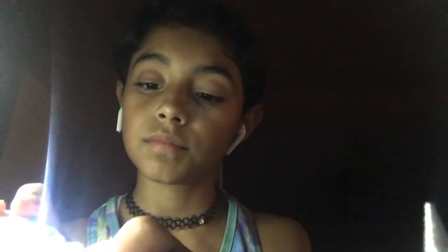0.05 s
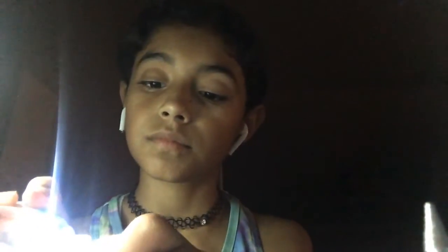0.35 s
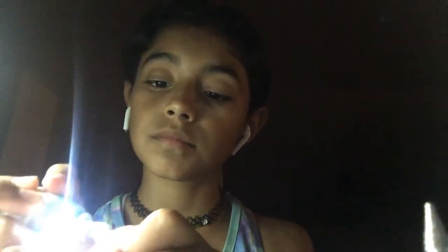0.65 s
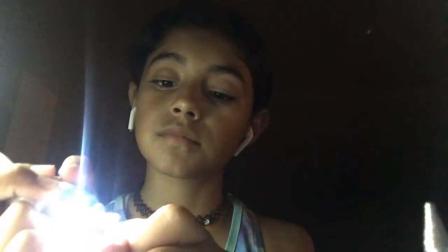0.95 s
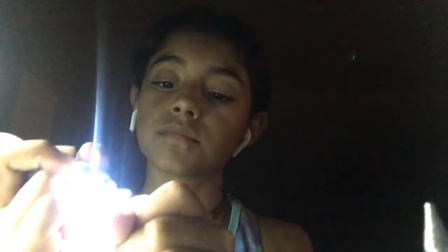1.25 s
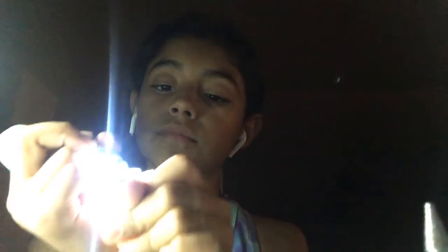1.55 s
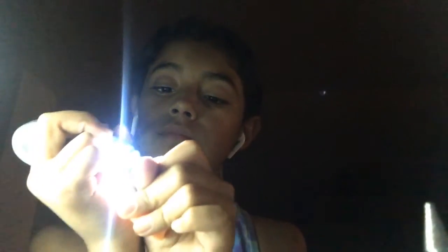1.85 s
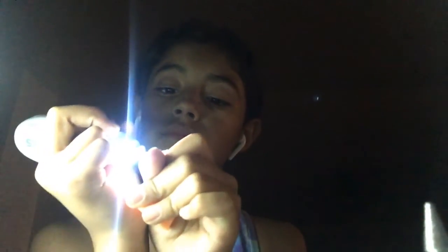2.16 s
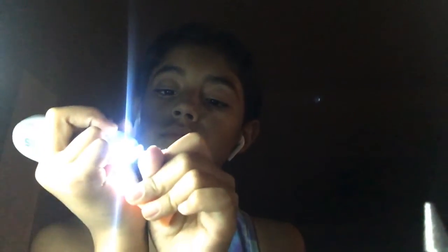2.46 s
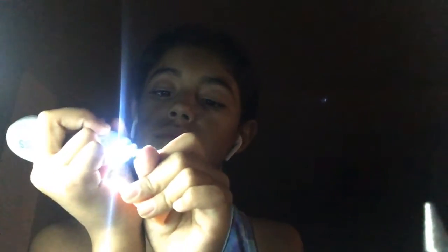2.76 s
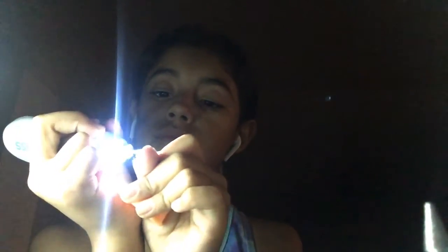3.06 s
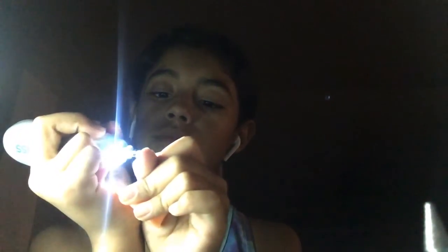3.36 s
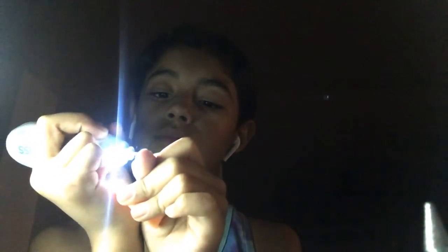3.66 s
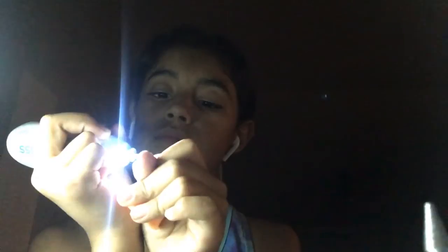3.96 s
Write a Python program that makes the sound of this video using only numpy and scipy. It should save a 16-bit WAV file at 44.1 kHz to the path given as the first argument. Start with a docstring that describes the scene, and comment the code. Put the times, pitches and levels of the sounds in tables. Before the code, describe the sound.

A small hand-held motor buzzes with a harsh rasp as its rotor catches on plastic. It briefly runs free with a faint whine, then rasps again, slowing and chattering under pressure, close to the microphone in a quiet room.

```python
"""A rasping buzz from a small hand-held motor in a quiet room, close to a narrow-band microphone.
The rotor, at about 100 turns/s, catches on something hard, probably the plastic casing: one knock a turn.
Pressed harder it slows, knocks twice a turn and chatters.
Running free, only its faint whine and hum are left."""
import sys
import numpy as np
from scipy import signal
from scipy.fft import rfft, irfft
from scipy.io import wavfile

SR = 44100
rng = np.random.default_rng(int(sys.argv[2]) if len(sys.argv) > 2 else 0)


def dump_mix(stems):
    """Bounce the given channels to the path in sys.argv[1] as a 16-bit WAV at rate SR."""
    frames = np.atleast_2d(stems).T  # one column per channel
    limited = np.clip(frames, -1, 1)  # hard clip at full scale
    pcm = np.round(limited * 32767).astype(np.int16)
    wavfile.write(sys.argv[1], SR, pcm)


N = 176400

# how firmly the rotor catches (time [s], relative knock level [dB])
CONTACT = [(0, -68), (.158, -72), (.168, -22.5), (.195, -12), (.226, -14), (.238, -13), (.26, -15),
           (.279, -21), (.32, -15.5), (.34, -21.5), (.352, -36), (.395, -34), (.422, -17.5), (.49, -14),
           (.53, -18.5), (.58, -12), (.64, -14), (.66, -19), (.705, -10.5), (.72, -16), (.74, -7.5),
           (.805, -10), (.825, -7.5), (1, -8), (1.015, -18), (1.04, -11.5), (1.06, -11), (1.125, -12.5),
           (1.18, -11.5), (1.21, -11), (1.25, -10.5), (1.267, -16), (1.288, -11), (1.395, -23),
           (1.42, -39.5), (1.48, -48), (1.517, -31.5), (1.54, -69), (1.562, -28), (1.59, -41.5),
           (1.66, -24), (1.69, -37.5), (1.702, -24), (1.729, -12.5), (1.778, -14.5), (1.805, -26.5),
           (1.848, -17), (1.877, -25.5), (1.887, -34), (1.918, -38), (1.944, -19), (1.962, -16.5),
           (2.01, -16.5), (2.055, -10.5), (2.24, -11), (2.3, -7.5), (2.4, -10.5), (2.42, -8), (2.43, -14),
           (2.565, -10.5), (2.585, -25.5), (2.602, -5), (2.7, -9.5), (2.742, -8.5), (2.765, -6.5),
           (2.945, -6), (2.97, -15), (3.06, -14), (3.14, -8.5), (3.17, -11), (3.3, -8.5), (3.318, -22),
           (3.332, -7.5), (3.645, -5.5), (3.7, -9), (3.75, -7), (3.86, -6.5), (3.905, -8.5), (3.923, -16.5),
           (3.94, -7), (4, -9)]
# pressure on the rotor (time [s], second knock re first [dB], chatter [0-1])
PRESSURE = [(0, -30, 0), (.58, -22.5, 0.13), (.65, -2, 0.77), (.69, -2, 0.95), (.8, -6, .7),
            (.84, -5, 0.24), (1, -3, 0.27), (1.05, 1, .8), (1.1, -12, 0.61), (1.16, -33, 0.19),
            (2.05, -43.5, .04), (2.39, -23, 0.17), (2.42, 1, 0.93), (2.58, 0.5, 1), (2.62, -4, 0.48),
            (2.78, -1.5, .3), (2.94, -4.5, 0.45), (2.99, -3.5, .9), (3.08, -50, 0.23), (3.2, -10.5, 0.13),
            (3.29, -19, 0.45), (3.33, 0, .3), (3.42, -2.5, .2), (3.6, -3, .25), (3.86, -4, .3),
            (4, -3.5, .6)]


def knocks(t, turns):
    """Rotor strikes as times [s] and levels [dB]: one a turn, a second under pressure, plus snags."""
    # single hard knocks as the rotor snags (time [s], relative level [dB])
    snags = [(0.5842, -7.5), (.594, -13.5), (.609, -9.5), (0.6303, -10), (.6415, -5.5), (1.056, -4.5),
             (1.0675, -5), (1.089, -6.5), (1.102, -9.5), (1.1215, -10.5), (2.367, -4.5), (2.473, -5.5),
             (2.511, -4), (2.988, -3.5), (3.02, -6), (3.07, -8), (3.31, -6), (3.9675, -3.5), (3.979, -5)]
    second_lag_turns = .55
    slip_s, chatter_s = 8e-6, .0005
    scatter_db, chatter_db = 1.0, 3.5
    turn, is_second = np.divmod(np.arange(800), 2)
    knock_s = np.interp(turn + second_lag_turns * is_second, turns, t, right=2 * t[-1])
    chatter = curve(PRESSURE, knock_s, column=2)
    time_jitter, level_jitter = rng.standard_normal((len(turn), 2)).T
    knock_db = curve(CONTACT, knock_s) + is_second * curve(PRESSURE, knock_s)
    knock_db += level_jitter * (scatter_db + chatter_db * chatter ** 2)
    knock_s += time_jitter * (slip_s + chatter_s * chatter ** 2)
    snag_s, snag_db = np.array(snags).T
    near_snag = np.abs(knock_s[:, None] - snag_s).min(axis=1) < .005
    return np.r_[snag_s, knock_s], np.r_[snag_db, knock_db - 20 * near_snag]


def rasp(t, turns):
    """Each knock rebounds, scrapes and rings the casing; firmer ones reach further into bass and treble."""
    # a faint lead-in click that softens each knock's attack, then two rebounds
    # (delay [s], level re knock [dB])
    side_hits = [(-.0003, -12), (.0006, -10.5), (.0014, -4)]
    # casing response, resonant near 1.35, 2.45, 3.55, 4.1, 5.6 kHz (frequency [Hz], gain [dB])
    casing = [(30, -56.5), (200, -54), (300, -38.5), (520, -28), (700, -29.5), (950, -22), (1120, -17),
              (1320, -6.5), (1480, -11.5), (1750, -18), (2100, -18), (2420, -5.5), (2820, -20), (3080, -10),
              (3300, -2.5), (3560, 2), (3830, -2), (4130, 1), (4330, -5), (4650, -11), (4900, -11.5),
              (5250, -15), (5600, -10), (6150, -19), (6650, -17.5), (7200, -25.5), (8000, -41)]
    # splits of the core range; each part varies from knock to knock (frequency [Hz])
    splits_hz = [2000, 3000, 3970]
    core_hz = (1140, 4530)  # rung even by a light knock
    scrape_db, scrape_s = -23, .0019
    gain_db, firm_db, band_scatter_db = 24, -10, 1.1
    knock_s, knock_db = knocks(t, turns)
    count, hits_per_knock = len(knock_s), len(side_hits) + 1
    spread = .016 + .16 * curve(PRESSURE, knock_s, column=2)
    side_s = [knock_s + delay_s * (1 + spread * rng.standard_normal(count)) for delay_s, _ in side_hits]
    hit_s = np.concatenate([knock_s] + side_s)
    hit_db = np.concatenate([knock_db] + [knock_db + drop_db for _, drop_db in side_hits])
    grit = undb(scrape_db) * rng.standard_normal(N)

    def force(hardening_db_per_db):
        scatter_db = band_scatter_db * rng.standard_normal(count)
        dull_db = hardening_db_per_db * np.minimum(knock_db - firm_db, 0)
        hits = impulses(hit_s, undb(hit_db + np.tile(dull_db + scatter_db, hits_per_knock)))
        scrape_envelope = signal.lfilter([1], [1, -np.exp(-1 / (scrape_s * SR))], hits)
        return hits + grit * scrape_envelope

    edges_hz = [core_hz[0], *splits_hz, core_hz[1]]
    core = sum(band(force(0), lo, hi) for lo, hi in zip(edges_hz, edges_hz[1:]))
    firm = force(hardening_db_per_db=.72)
    bass_and_treble = firm - band(firm, *core_hz)
    return undb(gain_db) * colour(core + bass_and_treble, casing)


def motor(t, turns):
    """Thin whine and lower hum, both locked to the rotor."""
    # motor tones, both tables (order [cycles/turn], relative level [dB])
    whine = [(9, -24), (24, -23.5), (25, -14), (26, -8.5), (27, 3.5), (28, -4.5), (29, -13.5), (30, -20),
             (31, -19), (32, -18.5), (33, -16)]
    hum = [(12, -3.5), (13, -5.5), (14, -4.5), (15, 0.5), (16, -9)]
    # tone gains (time [s], whine [dB], hum [dB])
    gains = [(0, -51.5, -79), (.16, -48.5, -65), (.25, -49, -62), (.37, -48.5, -63), (1.2, -53.5, -42.5),
             (1.45, -63.5, -57.5), (1.6, -67, -53.5), (1.65, -52, -54), (1.9, -57.5, -57.5),
             (2.1, -58, -41.5), (2.6, -54, -45), (4, -60, -43.5)]

    def tones(table):
        return sum(undb(db) * np.sin(2 * np.pi * (order * turns + rng.random())) for order, db in table)

    return undb(curve(gains, t)) * tones(whine) + undb(curve(gains, t, column=2)) * tones(hum)


def room(x):
    """Direct sound, near reflections and a short diffuse tail."""
    # reflections off near surfaces (delay [s], gain [dB])
    echoes = [(.0028, -19.5), (.0039, -19.5), (.0054, -18.5)]
    tail_db, t60_s = -14, .15
    t = np.arange(SR // 4) / SR
    tail = rng.standard_normal(len(t)) * undb(-60 * t / t60_s) * (t > .003)
    response = undb(tail_db) * tail / np.linalg.norm(tail)
    response[0] = 1
    for delay_s, db in echoes:
        response[int(delay_s * SR)] += undb(db)
    return signal.fftconvolve(x, response)[:N]


def background(t):
    """Steady hiss and a faint rumble that swells with the rasp."""
    # noise spectra, both tables (frequency [Hz], relative density [dB])
    hiss = [(30, -6.5), (150, 3), (400, 3), (1000, 8), (3000, 9.5), (5000, -9.5), (7000, -8), (8000, -17)]
    rumble = [(30, 1.5), (70, -1), (150, -4.5), (300, -7.5), (1000, -33.5), (8000, -68)]
    return noise(hiss, rms_db=-70) + noise(rumble, rms_db=curve(CONTACT, t) - 67)


def undb(db):
    """Decibels to gain."""
    return 10 ** (np.asarray(db) / 20)


def curve(table, t, column=1):
    """One table column, linearly interpolated in time."""
    rows = np.array(table, float)
    return np.interp(t, rows[:, 0], rows[:, column])


def colour(x, points):
    """Minimum-phase filter through (frequency [Hz], gain [dB]) points."""
    hz, db = np.array(points, float).T
    grid_hz = np.maximum(np.fft.rfftfreq(2048, 1 / SR), 1)
    gain = undb(np.interp(np.log(grid_hz), np.log(hz), db))
    cepstrum = irfft(np.log(gain))
    half = len(cepstrum) // 2
    cepstrum[1:half] *= 2
    cepstrum[half + 1:] = 0
    response = irfft(np.exp(rfft(cepstrum)))
    return signal.fftconvolve(x, response)[:N]


def impulses(times_s, sizes):
    """Clicks, each shared between two neighbouring samples."""
    inside = (times_s > 0) & (times_s < (N - 2) / SR)
    at, sizes = times_s[inside] * SR, sizes[inside]
    i = at.astype(int)
    return np.bincount(i, sizes * (1 - at + i), N) + np.bincount(i + 1, sizes * (at - i), N)


def band(x, lo_hz, hi_hz):
    """Soft-edged band-pass; adjacent bands sum flat."""
    f = np.fft.rfftfreq(2 * N, 1 / SR)
    below = lambda hz: 1 / (1 + (f / hz) ** 20)
    return irfft(rfft(x, 2 * N) * (below(hi_hz) - below(lo_hz)))[:N]


def noise(spectrum, rms_db):
    """Coloured noise at a given level."""
    x = colour(rng.standard_normal(N), spectrum)
    return undb(rms_db) * x / x.std()


def scene():
    """Rotor speed drives the knocks and motor tones, over hiss and rumble."""
    # rotor speed (time [s], speed [turns/s])
    speed = [(0, 101.5), (.17, 102.4), (.25, 95), (.4, 103.7), (.57, 99.3), (.64, 86), (.72, 81), (.83, 87),
             (1.08, 88), (1.18, 97.7), (1.38, 101.5), (1.46, 103.5), (1.68, 103.8), (1.78, 101.7),
             (1.92, 103.5), (2.03, 102.8), (2.11, 94.8), (2.38, 96.7), (2.48, 86.4), (2.6, 94.2),
             (2.69, 86.8), (2.78, 91.2), (2.94, 89), (3.03, 90.2), (3.11, 98), (3.2, 103.5), (3.29, 96.6),
             (3.37, 85), (3.52, 78), (3.7, 74.4), (3.78, 84.7), (3.89, 88.7), (4, 87.6)]
    t = np.arange(N) / SR
    turns = np.cumsum(curve(speed, t)) / SR - .25
    floor = background(t)
    return (room(rasp(t, turns)) + motor(t, turns) + floor)[None]


def record(dry):
    """The microphone rounds the highest peaks and cuts the top steeply."""
    ceiling, top_hz = .85, 7600
    rounded = dry / (1 + (dry / ceiling) ** 4) ** .25
    lowpass = signal.cheby1(14, .2, top_hz, fs=SR, output="sos")
    return signal.sosfilt(lowpass, rounded)


dry = scene()
out = record(dry)
dump_mix(out)
```